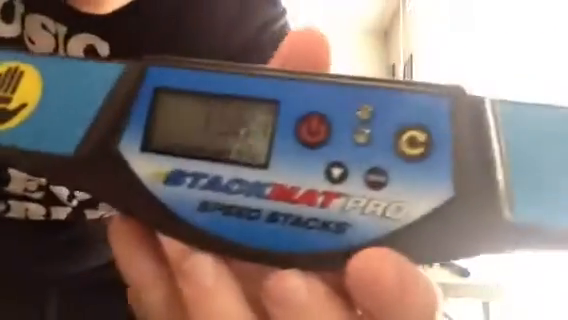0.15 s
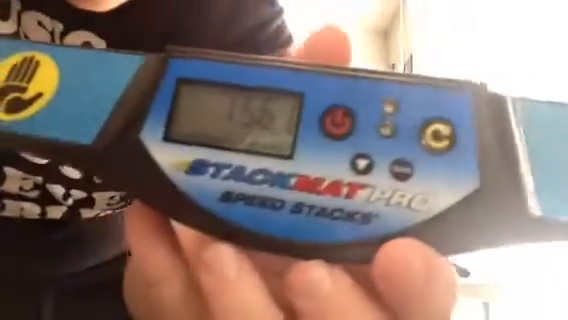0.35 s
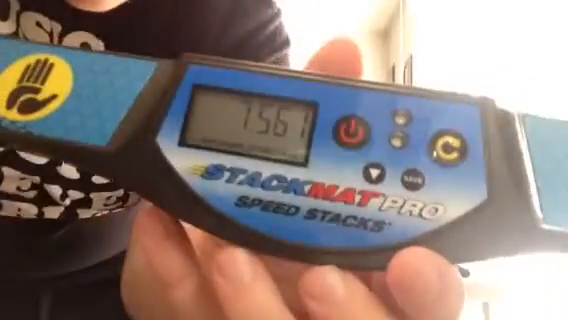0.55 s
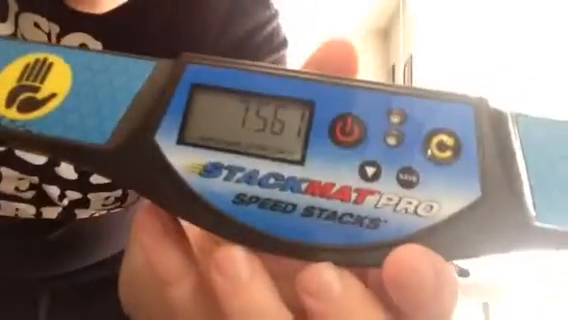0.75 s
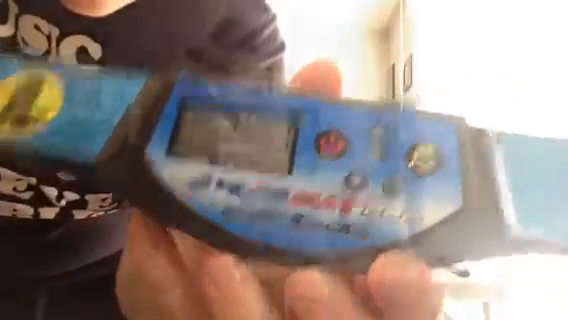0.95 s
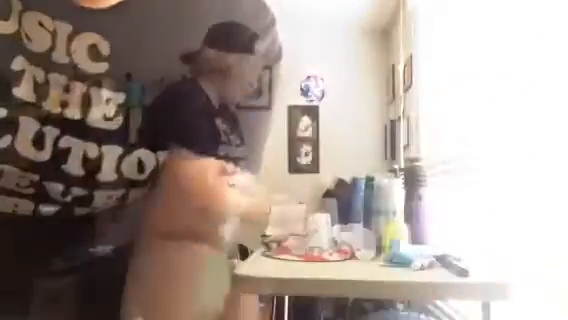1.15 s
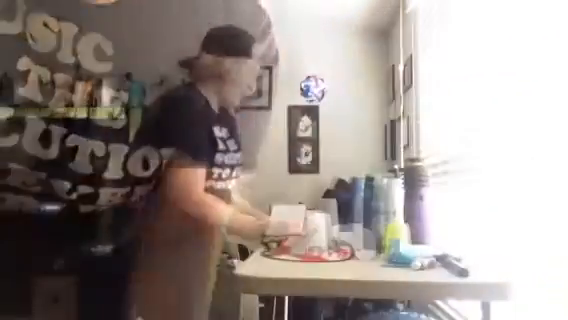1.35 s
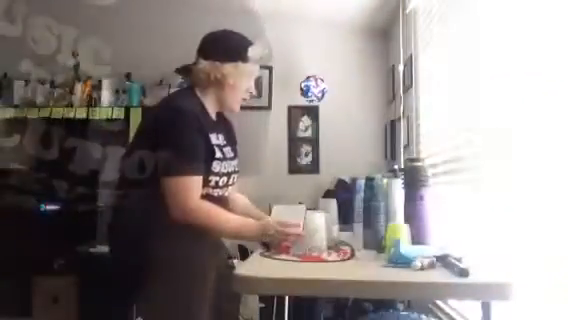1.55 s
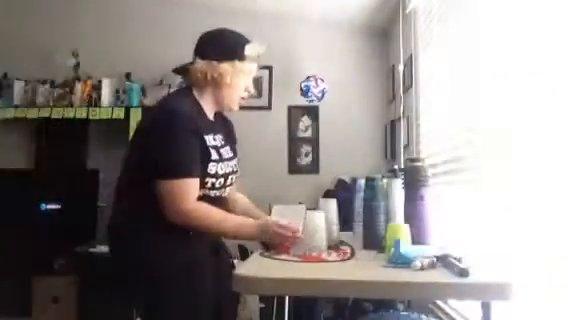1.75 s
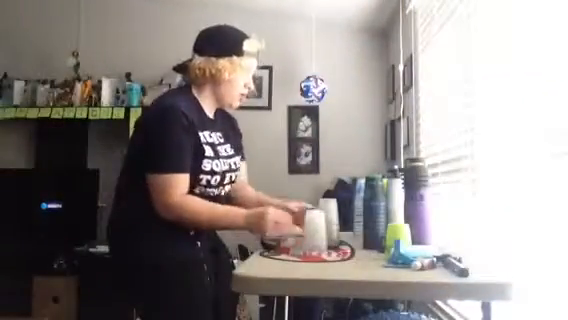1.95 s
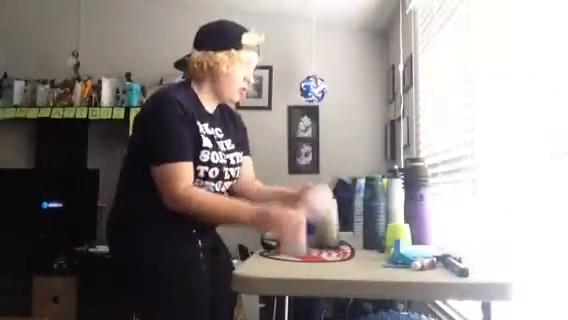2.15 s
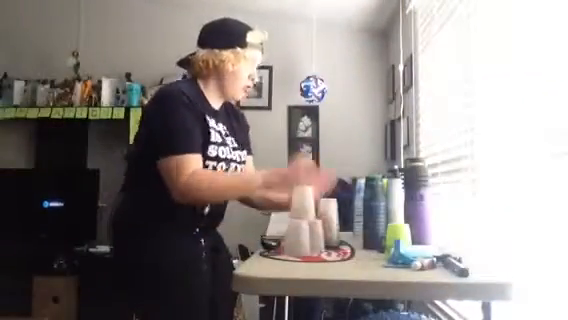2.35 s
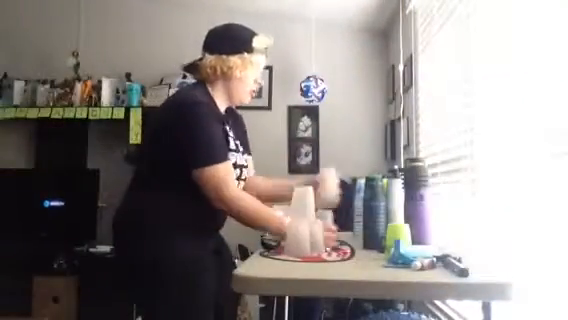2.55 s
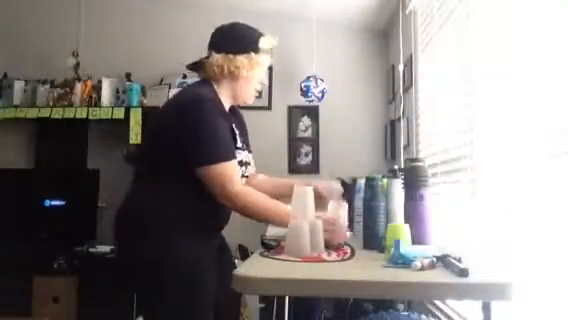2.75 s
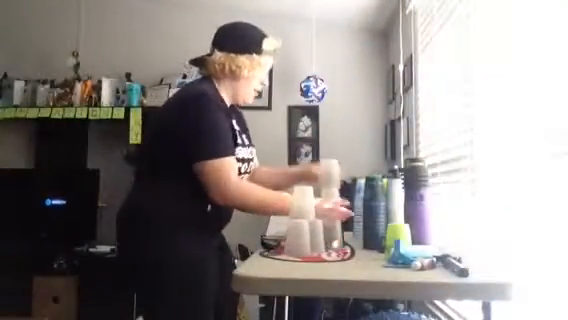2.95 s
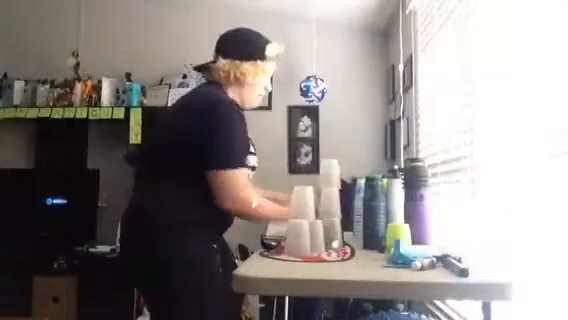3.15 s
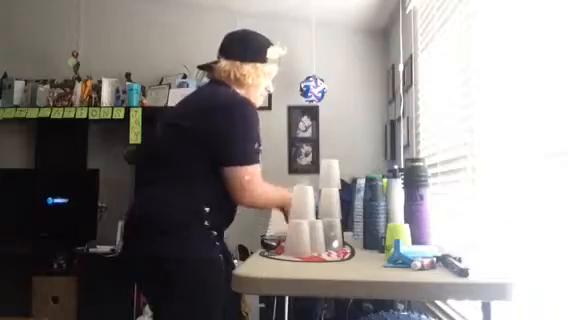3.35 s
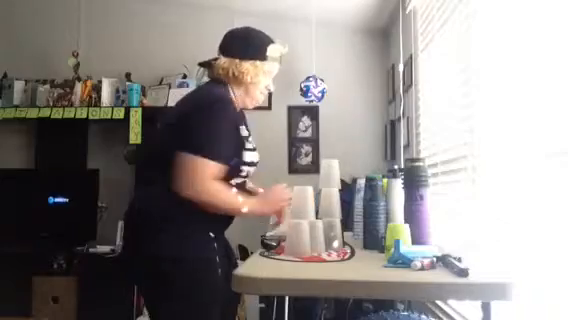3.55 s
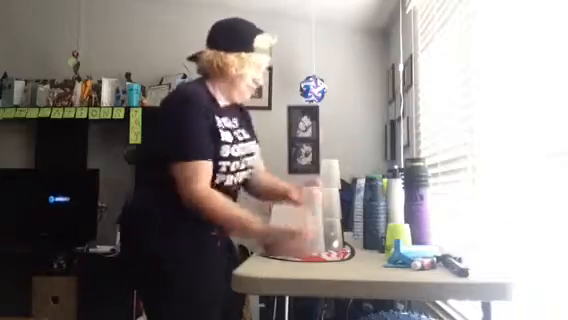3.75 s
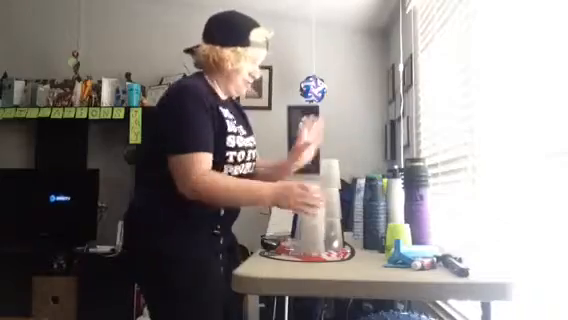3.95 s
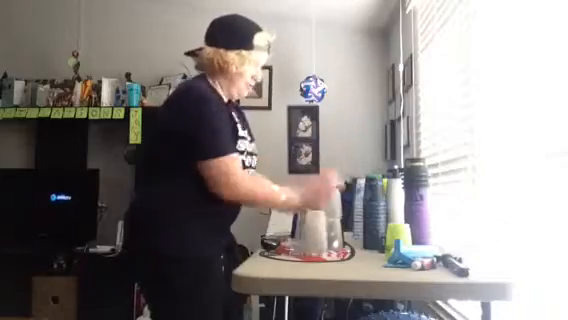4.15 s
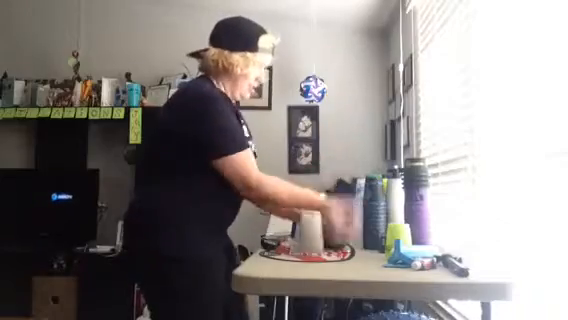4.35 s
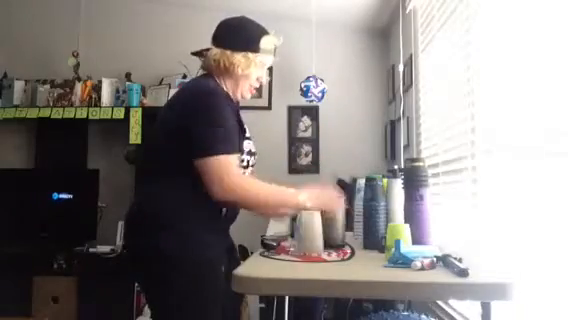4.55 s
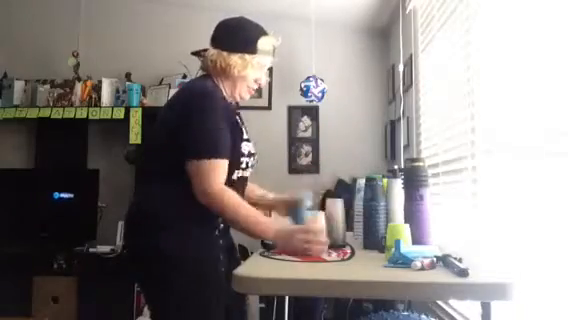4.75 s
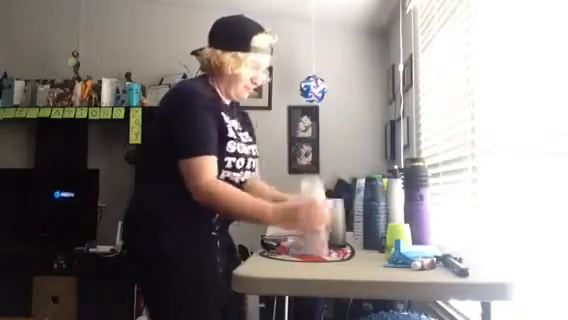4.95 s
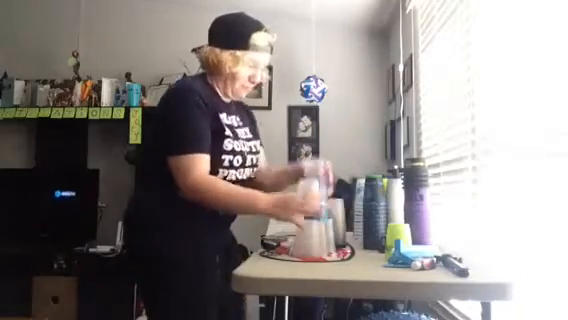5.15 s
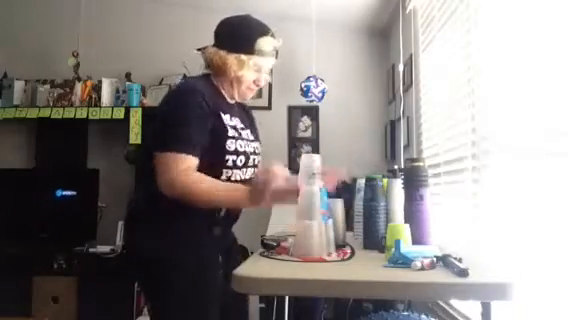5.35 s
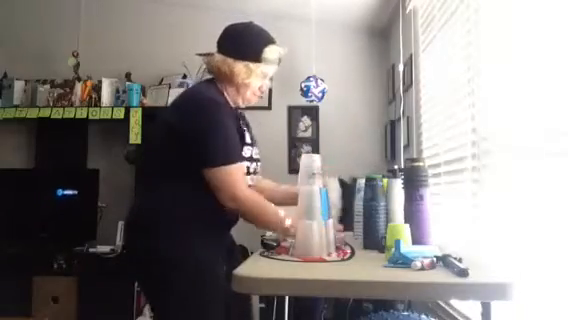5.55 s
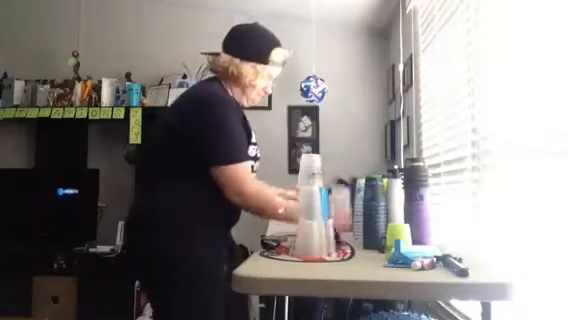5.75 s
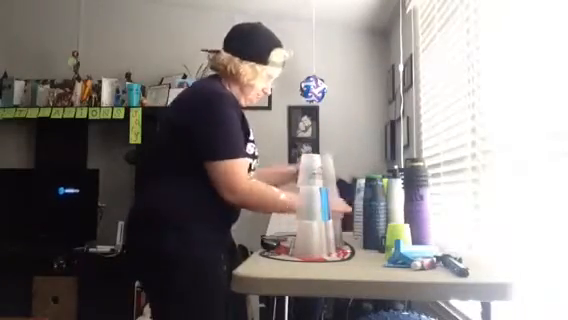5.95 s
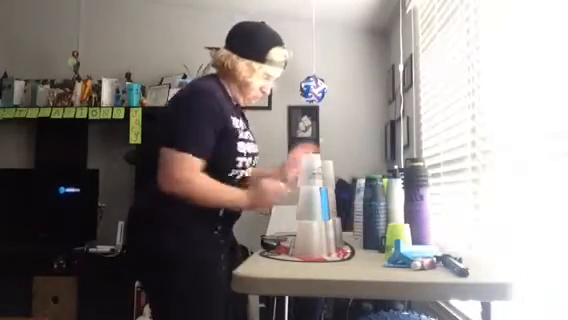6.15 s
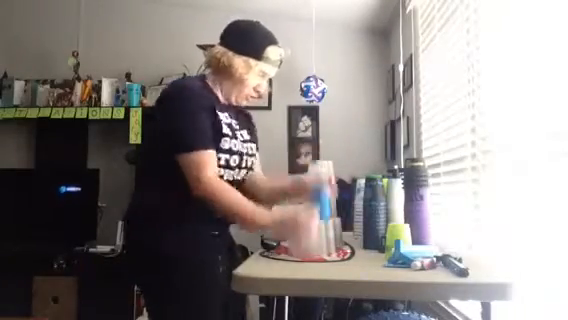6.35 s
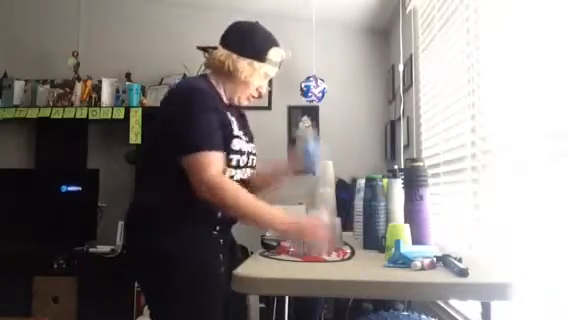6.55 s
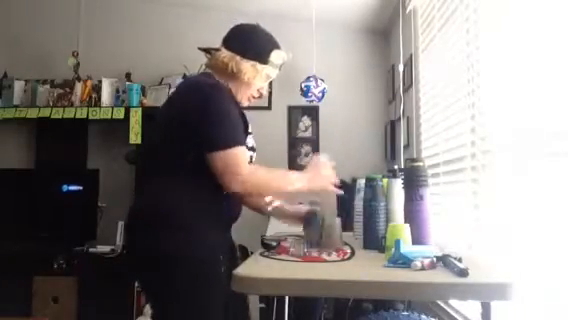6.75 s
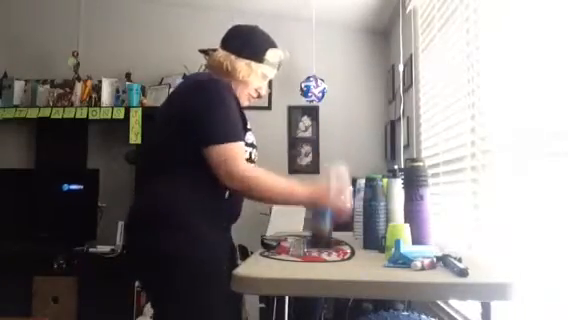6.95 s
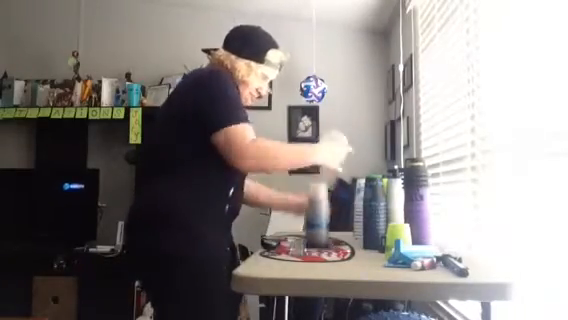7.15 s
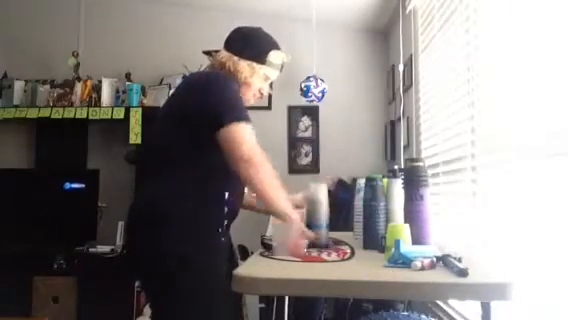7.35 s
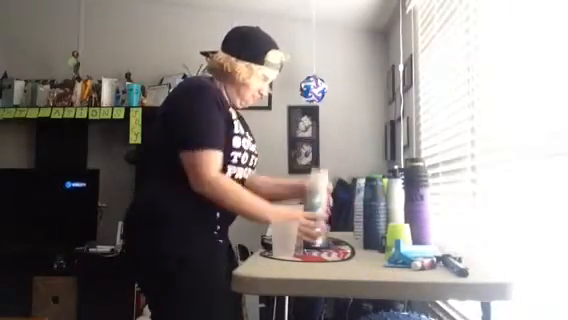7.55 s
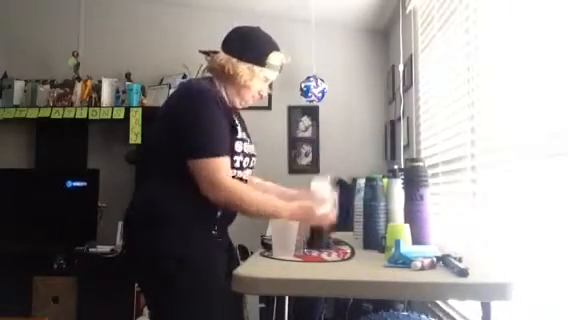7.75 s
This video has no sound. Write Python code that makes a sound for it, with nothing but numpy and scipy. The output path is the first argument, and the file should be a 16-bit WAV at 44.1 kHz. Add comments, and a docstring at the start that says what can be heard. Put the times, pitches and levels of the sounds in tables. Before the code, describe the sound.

A few faint taps, then fast clicking, popping and sliding of plastic cups being stacked on a table over steady hiss.

```python
"""A few light taps, then a fast clatter: plastic cups stacked into pyramids and swept down again.
Rims click against each other, the air inside a nesting cup pops, and walls rub and tick as they slide.
The cups land on a mat on a folding table, whose hollow top thumps under them.
A small room rings briefly over a steady hiss."""
import sys
import numpy as np
from scipy import signal
from scipy.fft import rfft, irfft
from scipy.io import wavfile
from scipy.ndimage import uniform_filter1d

SR = 44100
rng = np.random.default_rng(int(sys.argv[2]) if len(sys.argv) > 2 else 0)


def waveform_to_disk(signal):
    """Save audio, clipped to [-1, 1], as 16-bit WAV at the path in sys.argv[1]."""
    frames = np.transpose(np.atleast_2d(signal))
    scaled = np.clip(frames, -1, 1) * 32767
    samples = np.round(scaled).astype(np.int16)
    wavfile.write(sys.argv[1], SR, samples)


N = 344421
PLACES = 6  # tracks, each with its own room tail

# Spectrum of a struck cup wall. Each row: frequency in Hz, gain in dB.
WALL_SPECTRUM = [(100, -3.5), (250, 7), (900, 5), (1800, 1.5), (2700, -1), (4100, 0), (5700, -3),
                 (7500, -3), (9500, -2), (11500, -12.5), (15500, -21.5)]
# Bending modes of the thin wall. Each row: frequency in Hz, gain in dB.
WALL_MODES = [(1950, -9), (2290, -14.5), (2450, -7), (3120, -6), (4050, -9), (4450, 0), (4890, -11),
              (5370, 4.5), (5830, 2), (6510, -8), (9600, -49)]


def rim_clicks(gain_db=14):
    """A rim clicks against a cup; the crack spreads into the room in two directions."""
    # Each row: start in seconds, relative level in dB, wall resonance in Hz, treble gain in dB,
    # decay in seconds.
    clicks = [(1.289, -33.5, 3140, 7, 0.0021), (1.5754, -33.5, 6000, -16, .005),
              (2.1497, -29, 4300, 4, 0.0028), (2.2159, -28, 5600, 11, .003),
              (2.3318, -21, 2600, -16, 0.0097), (2.3594, -8, 6600, 15, 0.013),
              (2.3653, -10.5, 4330, -14, 0.0053), (2.637, -37, 5100, 3, .003),
              (2.7547, -31.5, 5200, 5, 0.003), (2.7995, -20.5, 5200, -1, 0.0029),
              (2.8191, -14.5, 3900, 5, 0.0024), (2.896, -19, 4300, 4, 0.0045),
              (2.9681, -25.5, 4900, -4, 0.002), (3.018, -27, 5600, -3, 0.0025),
              (3.0456, -6, 5300, -15, 0.012), (3.052, -14, 5700, 0, 0.0037), (3.2804, -27, 3500, 2, 0.0023),
              (3.2921, -20, 4000, -3.5, 0.0045), (3.4487, -11, 5000, -3, 0.0099),
              (3.4635, -5, 5860, -7, 0.021), (3.4784, -12, 5200, 2, 0.003),
              (3.7778, -19.5, 5160, -16, 0.015), (3.9619, -12, 4740, 1.5, 0.0035),
              (4.0262, -27, 2800, 8, .003), (4.1072, -10.5, 3360, 6.5, 0.0066),
              (4.1726, -12.5, 5230, 21, 0.0028), (4.2395, -12, 5200, 11, 0.0064),
              (4.2785, -5.5, 4280, -3, 0.0016), (4.371, -5, 4860, 6, 0.0048),
              (4.4507, -9, 4340, -20, 0.0055), (4.6124, -18, 3000, 9, 0.0036),
              (4.6409, -10, 2500, 6, 0.0073), (4.6671, -6, 4200, 5, 0.011), (4.8194, -21, 5200, 3, 0.011),
              (4.9144, -19.5, 2870, -2, 0.0047), (5.0599, -37, 2500, 23, 0.0025),
              (5.1599, -15.5, 4900, -4, 0.006), (5.2564, -27.5, 6570, 14, 0.0032),
              (5.2784, -25, 5200, 0, 0.009), (5.3323, -17.5, 4500, -13, 0.0042),
              (5.3491, -14, 4470, 4, 0.0069), (5.5433, -36, 4200, 16, 0.0056),
              (5.6282, -29, 5600, -9, .003), (5.8636, -21.5, 4500, 3, 0.0026),
              (5.9432, -17.5, 4600, -2, 0.00086), (6.0239, -24, 4470, -18, 0.0076),
              (6.0554, -25.5, 5800, -18, 0.0039), (6.119, -10, 5300, -2, 0.021),
              (6.1331, -14.5, 5500, -17, 0.0031), (6.4, -22, 5430, -6, .005),
              (6.4308, -8, 5240, -8, 0.0097), (6.4471, -6, 3480, -5, 0.0091),
              (6.4762, -10, 5000, 10, 0.0037), (6.495, -8.5, 5200, 3, 0.0028),
              (6.5313, -7.5, 5840, 11, 0.0044), (6.6599, -9, 4400, 1.5, 0.0045),
              (6.7348, -19, 5500, 7, 0.0069), (6.775, -13.5, 4800, -1, 0.0049),
              (6.7956, -14.5, 4900, -3, 0.0079), (6.852, -12.5, 5400, -18, 0.0045),
              (6.9157, -12, 3300, 3, 0.013), (6.9664, -12, 3880, -30, 0.0072),
              (7.0112, -28, 6400, -22.5, 0.0013), (7.0842, -14.5, 5840, -6, 0.0018),
              (7.146, -22, 3040, -6, 0.0033), (7.1953, -17, 5300, 0, 0.004),
              (7.323, -32.5, 3290, -33, 0.0025), (7.4107, -27, 5500, -28, 0.0031),
              (7.4205, -19, 2250, -32, 0.0068), (7.7026, -26, 5100, -1, 0.0028)]
    out = np.zeros((PLACES, N))
    for k, (start_s, db, ring_hz, treble_db, decay_s) in enumerate(clicks):
        for direction in range(2):
            crack = rim_crack(db, ring_hz, treble_db, decay_s)
            add(out[(k + direction) % PLACES], start_s, from_db(db + gain_db) * crack)
    return out


def rim_crack(db, ring_hz, treble_db, decay_s, ring_db=4, modes_db=1, scatter_db=5):
    """Thin walls crack for milliseconds; each contact point favours its own resonances."""
    softness = np.clip(-db / 20 - .5, 0, 1)  # light touches build more slowly
    crack = burst(max(decay_s, .001), rise_s=.00006 + .004 * softness)
    stiffness = rng.uniform(.93, 1.07)  # varies with grip and nesting
    modes = 0
    for mode_hz, mode_db in WALL_MODES:
        gain = from_db(mode_db + rng.normal(0, scatter_db))
        modes += gain * resonance(crack, mode_hz * stiffness, width_hz=170)
    ring = resonance(crack, ring_hz, width_hz=800)
    crack = crack + from_db(modes_db) * modes + from_db(ring_db) * ring
    treble = signal.lfilter(*signal.butter(1, 7000, "high", fs=SR), crack)
    crack = crack + (from_db(treble_db) - 1) * treble
    # the table's reflection cuts different notches each time
    crack = crack + .45 * delayed(crack, delay_s=rng.uniform(.0002, .0011))
    return unit_energy(coloured(crack, WALL_SPECTRUM))


def air_pops(skirt_hz=480, gain_db=19):
    """Air in a cup rings: nesting depth sets the pitch, a tighter seal rings longer."""
    # Each row: start in seconds, relative level in dB, cavity pitch in Hz, resonance width in Hz.
    pops = [(1.29, -35.5, 1630, 440), (2.359, -9.5, 1255, 370), (2.377, -13, 686, 220),
            (2.819, -25, 1110, 300), (2.971, -20, 900, 260), (3.018, -21.5, 1270, 210),
            (3.048, -6.5, 1240, 280), (3.293, -28, 1340, 270), (3.464, -8, 1170, 120),
            (3.476, -8.5, 824, 360), (3.485, -6.5, 1010, 260), (3.778, -21.5, 840, 210),
            (3.964, -23, 1450, 180), (4.108, -18.5, 1350, 240), (4.147, -17, 1210, 140),
            (4.175, -19.5, 970, 100), (4.238, -21, 1250, 300), (4.279, -17, 875, 250),
            (4.45, -21.5, 836, 250), (4.612, -18, 1240, 250), (4.667, -8, 975, 220),
            (4.687, -10.5, 820, 150), (4.836, -26.5, 980, 100), (4.916, -26, 1830, 300),
            (5.258, -14, 1090, 74), (5.276, -17.5, 1080, 120), (5.349, -8, 1221, 20),
            (5.352, -6.5, 1080, 130), (5.628, -21, 996, 110), (5.652, -27, 1025, 110),
            (6.023, -23.5, 1040, 330), (6.121, -9.5, 1230, 220), (6.135, -20, 1230, 260),
            (6.403, -17.5, 1050, 200), (6.42, -16.5, 855, 250), (6.456, -13, 730, 250),
            (6.532, -12.5, 1120, 320), (6.659, -17, 824, 140), (6.737, -14, 1160, 300),
            (6.918, -17, 820, 250), (7.196, -13, 1170, 120), (7.7, -25, 805, 200)]
    out = np.zeros((PLACES, N))
    for k, (start_s, db, cavity_hz, width_hz) in enumerate(pops):
        puff = burst(decay_s=.00342, rise_s=.00054)
        cavity = resonance(puff, cavity_hz, width_hz)
        pop = unit_energy(resonance(cavity, cavity_hz, skirt_hz))
        add(out[k % PLACES], start_s, from_db(db + gain_db) * pop)
    return out


def table_thumps(cushion_hz=3000, focus_db=7, flex_db=-12, swing_up_s=.004835, gain_db=21):
    """Cups and hands land on the mat; each blow drives the table modes, most those near its pitch."""
    # Each row: time in seconds, relative level in dB, pitch of the blow in Hz.
    landings = [(1.22, -39, 190), (1.29, -35.5, 315), (1.41, -39, 180), (1.58, -40, 200), (2.211, -28, 173),
                (2.327, -14.5, 308), (2.341, -9.5, 307), (2.384, -10, 322), (2.644, -29, 177),
                (2.794, -12.5, 238), (2.818, -18.5, 284), (2.892, -13, 308), (2.972, -12.5, 347),
                (3.016, -16, 346), (3.048, -12.5, 307), (3.284, -29.5, 190), (3.441, -9.5, 375),
                (3.464, -9, 375), (3.483, -7.5, 360), (3.779, -19, 189), (3.825, -13, 211),
                (3.961, -21.5, 388), (4.121, -19.5, 294), (4.174, -21.5, 336), (4.236, -14, 316),
                (4.263, -14, 426), (4.305, -18, 330), (4.281, -9, 215), (4.37, -20, 355), (4.455, -11, 224),
                (4.623, -15, 350), (4.66, -16, 340), (4.923, -24.5, 340), (5.164, -14.5, 330),
                (5.262, -17, 650), (5.353, -13.5, 636), (5.555, -29.5, 181), (5.634, -26, 334),
                (5.853, -16, 221), (5.939, -14.5, 302), (5.985, -20.5, 260), (6.022, -17, 444),
                (6.069, -17.5, 494), (6.119, -12.5, 466), (6.135, -8.5, 487), (6.401, -15, 243),
                (6.459, -12.5, 330), (6.494, -12, 348), (6.668, -15, 247), (6.739, -11, 328),
                (6.769, -13.5, 630), (6.792, -9.5, 317), (6.824, -9.5, 350), (6.854, -8, 211),
                (6.916, -19, 407), (6.965, -11.5, 292), (7.095, -15.5, 315), (7.197, -21, 518),
                (7.327, -15.5, 305), (7.415, -8, 238), (7.704, -26, 187)]
    # Modes of the hollow top. Each row: frequency in Hz, width in Hz, gain in dB.
    top_modes = [(182.7, 38.7, 5.5), (201, 36, -3.5), (251, 35, -24), (319.5, 37.4, 2), (365, 45, -1.5),
                 (440, 22.5, -0.5), (531, 87, -7), (575.4, 14.7, 2.5), (646, 167, -9.5), (826, 8.6, 3.5),
                 (930, 30, -9.5)]
    out = np.zeros((PLACES, N))
    cushion = signal.butter(2, cushion_hz, fs=SR)
    for k, (time_s, db, blow_hz) in enumerate(landings):
        push = signal.lfilter(*cushion, burst(decay_s=.0035, rise_s=.0016, size=8192))
        push = push + from_db(focus_db) * resonance(push, blow_hz, width_hz=100)
        # neighbouring modes swing in opposite directions
        modes = sum((-1) ** m * from_db(mode_db) * resonance(push, hz, width_hz)
                    for m, (hz, width_hz, mode_db) in enumerate(top_modes))
        flex = resonance(push, hz=75, width_hz=110)  # the whole top gives on its legs
        thump = unit_energy(modes + from_db(flex_db) * flex)
        add(out[k % PLACES], time_s - swing_up_s, from_db(db + gain_db) * thump)
    return out


def sliding(rub_db=-2, skim_db=-13, rattle_db=-1, skim_growth=.83, rattle_growth=1.23):
    """Wall slides on wall: light strokes skim and hiss, a lower rattle grows faster with pressure."""
    # Spectra of light rubbing and of hard-pressed rattling. Each row: frequency in Hz, gain in dB.
    rub_spectrum = [(150, -13), (400, 13), (1200, 18.5), (2500, 13), (4000, 6), (5700, 8.5), (7800, -0.5),
                    (9500, -1), (11500, -5), (15500, -32)]
    rattle_spectrum = [(120, -34), (300, 24.5), (700, 21.5), (1300, 16), (2500, -12), (4300, -40),
                       (6000, -53), (9000, 7.5), (15500, -3)]
    level_db = strokes_db()
    hardest_db = level_db.max()
    glancing_db = hardest_db + skim_growth * (level_db - hardest_db)
    pressed_db = hardest_db + rattle_growth * (level_db - hardest_db)
    rub = slips(rub_spectrum, per_s=7000, uneven_db=2.5)
    skim = unit_rms(resonance(rub, hz=7800, width_hz=2500))
    rattle = slips(rattle_spectrum, per_s=800, uneven_db=1.5)
    return (from_db(level_db + rub_db) * rub
            + from_db(glancing_db + skim_db) * skim
            + from_db(pressed_db + rattle_db) * rattle)


def strokes_db(swell_db_per_s=343, sag_db_per_s=24.5, fade_db_per_s=248):
    """Sliding level: swells as the hand speeds up, sags under friction, fades as the cups seat."""
    # Each row: time of full speed in seconds, hold in seconds, relative level in dB.
    strokes = [(1.2, .03, -59), (2.165, 0.038, -45.5), (2.32, .02, -41.5), (2.98, .05, -39.5),
               (3.3, 0.011, -40.5), (3.71, 0.18, -38), (3.948, 0.15, -36), (4.17, 0.074, -34),
               (4.27, .05, -23.5), (4.48, 0.019, -29), (4.656, 0.013, -22.5), (4.83, 0.052, -38.5),
               (5.66, 0.27, -51), (5.95, .1, -54), (6.12, 0.2, -44.5), (6.45, .07, -26),
               (6.77, 0.36, -26.5), (7.11, 0.022, -46), (7.45, 0.012, -42), (7.55, 0.18, -49),
               (7.708, 0.0067, -35.5)]
    full_speed_s, hold_s, db = np.transpose(strokes)
    grid_s = np.arange(0, N, 32) / SR
    age_s = grid_s[:, None] - full_speed_s
    swell_db = swell_db_per_s * np.maximum(-age_s, 0)
    sag_db = sag_db_per_s * np.maximum(age_s, 0)
    fade_db = fade_db_per_s * np.maximum(age_s - hold_s, 0)
    loudest_db = (db - swell_db - sag_db - fade_db).max(axis=1)
    return np.interp(np.arange(N) / SR, grid_s, loudest_db)


def slips(spectrum, per_s, uneven_db):
    """Tiny random slips of uneven size, coloured by the cup walls; rms 1."""
    sizes = rng.standard_normal(N) * from_db(uneven_db * np.minimum(rng.exponential(1, N), 4))
    slipping = rng.random(N) < per_s / SR
    return unit_rms(coloured(slipping * sizes, spectrum))


def wall_ticks(per_s=70, uneven_db=3, modes_db=2, lowpass_hz=9000, gain_db=19):
    """Sliding rims catch on the walls at random; each tick rings one of several cups."""
    ticks = []
    for _ in range(PLACES):
        stiffness = rng.uniform(.85, 1.15)
        tap = coloured(burst(decay_s=.0011, rise_s=.0001), WALL_SPECTRUM)
        tap = signal.lfilter(*signal.butter(2, lowpass_hz, fs=SR), tap)
        modes = sum(from_db(db + modes_db) * resonance(tap, hz * stiffness, width_hz=260)
                    for hz, db in WALL_MODES)
        ticks.append(unit_energy(tap + modes))
    out = np.zeros((PLACES, N))
    tick_db = gain_db + strokes_db() + uneven_db * rng.standard_normal(N)
    for i in np.flatnonzero(rng.random(N) < per_s / SR):
        add(out[i % PLACES], i / SR, from_db(tick_db[i]) * ticks[i % PLACES])
    return out


def in_room(tracks, tails, wet_db, echo_s=.0175, echo_lowpass_hz=1800, echo_db=-6):
    """Direct sound, one dull echo off the far wall, and a diffuse tail for each track."""
    direct = tracks.sum(axis=0)
    echo = signal.lfilter(*signal.butter(1, echo_lowpass_hz, fs=SR), delayed(direct, echo_s))
    diffuse = sum(signal.oaconvolve(track, tail)[:N] for track, tail in zip(tracks, tails))
    return direct + from_db(echo_db) * echo + from_db(wet_db) * diffuse


def room_tail(build_s=.00067, size=32768, bands=9):
    """Diffuse reflections build within milliseconds, then die band by band."""
    # Each row: frequency in Hz, reverberation time in seconds.
    t60 = [(150, .31), (400, .31), (1250, .29), (2800, .34), (6000, .34), (14000, .27)]
    t = np.arange(size) / SR
    bins_hz = np.fft.rfftfreq(size, 1 / SR)
    centres_hz = np.geomspace(100, 15000, bands)
    white = rfft(rng.standard_normal(size))
    tail = 0
    for hz, share in zip(centres_hz, np.eye(bands)):
        band = irfft(white * at_hz(np.c_[centres_hz, share], bins_hz))
        tail += band * from_db(-60 * t / at_hz(t60, hz))
    onset = 1 - np.exp(-(t / build_s) ** 2)
    spectrum = rfft(tail * onset)
    # a furnished room favours no broad band
    even = irfft(spectrum / np.sqrt(uniform_filter1d(abs(spectrum) ** 2, size=41)))
    return unit_energy(even * onset * (t < t[-1] - .1))


def room_hiss():
    """Steady background air with a faint, wavering hum."""
    # Each row: frequency in Hz, relative density in dB.
    air_spectrum = [(30, -24), (80, -5), (135, 3.5), (170, -1.5), (210, -0.5), (270, -6), (340, -1),
                    (420, -5), (590, -1.5), (700, -2), (2100, -10), (3300, -19.5), (4600, -18.5),
                    (7000, -32), (11000, -38), (15500, -50)]
    # Each row: time in seconds, level in dB.
    levels = [(0, -43.5), (1.0, -44.5), (1.4, -46.5), (1.9, -43), (2.6, -44)]
    # Each row: frequency in Hz, width in Hz, gain over the hiss in dB.
    hum_tones = [(342.3, 6.8, 3), (595, 10.4, 5.5)]
    white = rng.standard_normal(N)
    hum = sum(from_db(db) * resonance(white, hz, width_hz) for hz, width_hz, db in hum_tones)
    level_db = np.interp(np.arange(N) / SR, *np.transpose(levels))
    return from_db(level_db) * unit_rms(coloured(white + hum, air_spectrum, size=8192))


def burst(decay_s, rise_s, size=4096):
    """A swelling, then dying patter of micro-contacts; even spectrum, unit energy."""
    t = np.arange(size) / SR
    envelope = (1 - np.exp(-t / rise_s)) * np.exp(-t / decay_s)
    patter = rng.standard_normal(size) * envelope
    for _ in range(3):
        whitened = irfft(np.exp(1j * np.angle(rfft(patter))))
        patter = whitened * np.minimum(1, 2 * envelope / envelope.max())
    return unit_energy(patter)


def resonance(x, hz, width_hz):
    """Two-pole resonance, peak gain 1."""
    radius = np.exp(-np.pi * width_hz / SR)
    feedforward = np.array([1, 0, -1]) * (1 - radius ** 2) / 2
    feedback = [1, -2 * radius * np.cos(2 * np.pi * hz / SR), radius ** 2]
    return signal.lfilter(feedforward, feedback, x)


def coloured(x, spectrum, size=2048):
    """Minimum-phase filter from (Hz, dB) points."""
    gain = from_db(at_hz(spectrum, np.fft.rfftfreq(size, 1 / SR)))
    cepstrum = irfft(np.log(gain))
    cepstrum[1:size // 2] *= 2
    cepstrum[size // 2 + 1:] = 0
    impulse = irfft(np.exp(rfft(cepstrum)))
    return signal.fftconvolve(x, impulse)[:len(x)]


def at_hz(points, hz):
    """Interpolate on a log-frequency axis."""
    points_hz, values = np.transpose(points)
    return np.interp(np.log(np.maximum(hz, 1)), np.log(points_hz), values)


def from_db(db):
    """Decibels to gain."""
    return 10 ** (np.asarray(db) / 20)


def unit_energy(x):
    """Scale to a sum of squares of 1."""
    return x / np.sqrt(np.sum(x ** 2) + 1e-20)


def unit_rms(x):
    """Scale to an rms of 1."""
    return unit_energy(x) * np.sqrt(len(x))


def delayed(x, delay_s):
    """Shift later, same length."""
    return np.r_[np.zeros(int(delay_s * SR)), x][:len(x)]


def add(track, start_s, sound):
    """Mix a sound into a track."""
    i = max(0, int(start_s * SR))
    track[i:i + len(sound)] += sound[:max(0, N - i)]


def scene():
    """Contacts at changing places on the table, sliding and hiss, in one room."""
    tails = [room_tail() for _ in range(PLACES)]
    contacts = in_room(rim_clicks() + wall_ticks() + air_pops() + table_thumps(), tails, wet_db=-.5)
    friction = in_room(sliding()[None], tails, wet_db=-9)
    return (contacts + friction + room_hiss())[None]


def record(dry, low_cut_hz=160, leak_db=-21, ceiling=.93, high_cut_hz=15500):
    """Small microphone: a steep but leaky bass cut, rounded peaks, the top cut off."""
    low_cut = signal.butter(4, low_cut_hz, "high", fs=SR, output="sos")
    high_cut = signal.ellip(10, .2, 80, high_cut_hz, fs=SR, output="sos")
    thin = signal.sosfilt(low_cut, dry) + from_db(leak_db) * dry
    rounded = thin / (1 + (thin / ceiling) ** 6) ** (1 / 6)
    return signal.sosfilt(high_cut, rounded)


dry = scene()
out = record(dry)
waveform_to_disk(out)
```